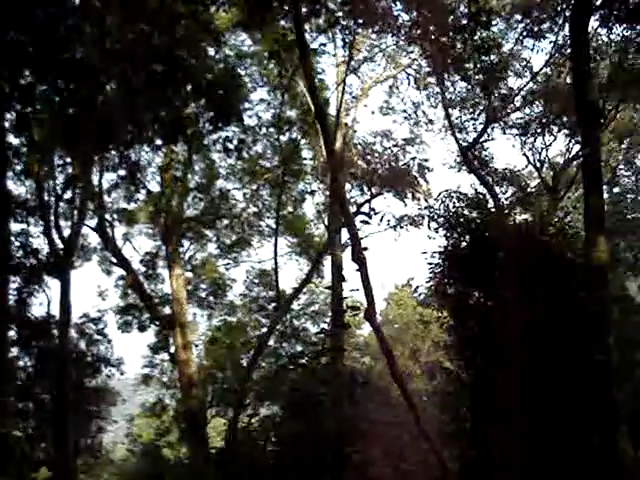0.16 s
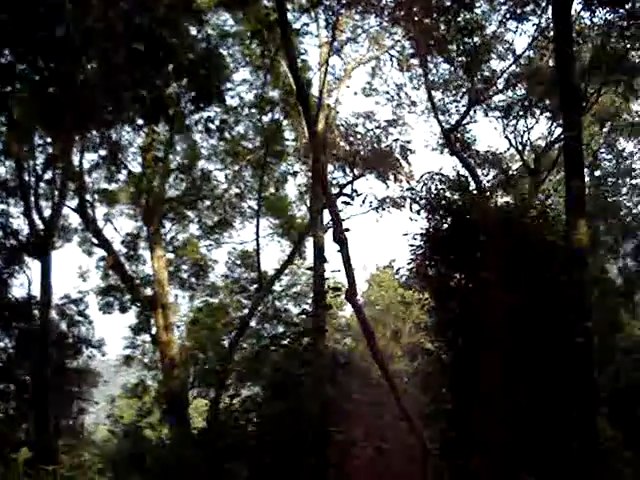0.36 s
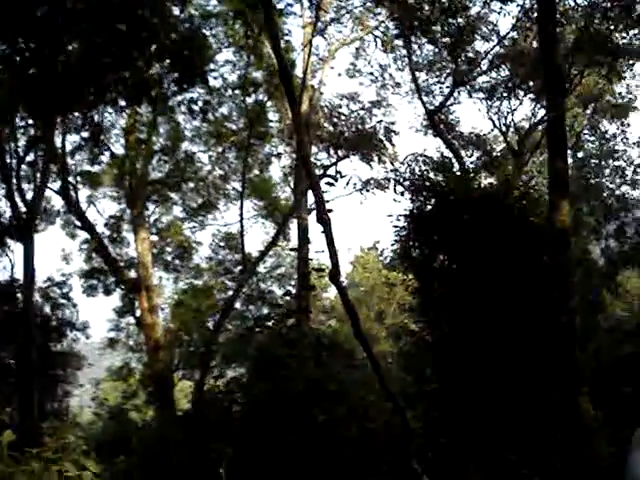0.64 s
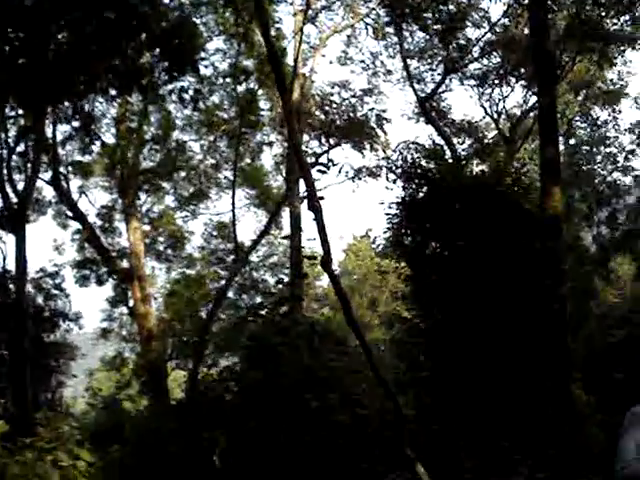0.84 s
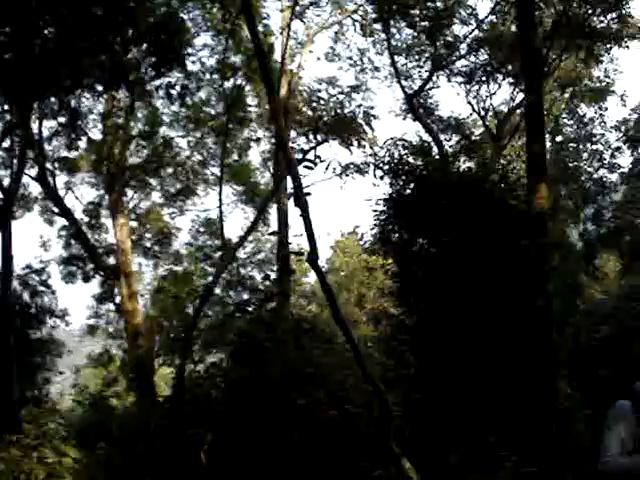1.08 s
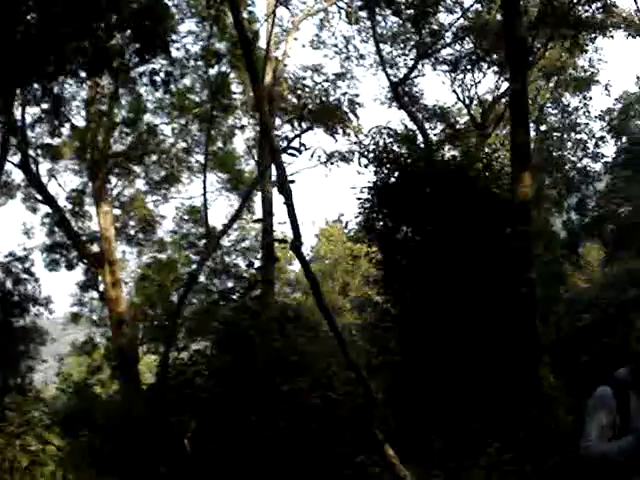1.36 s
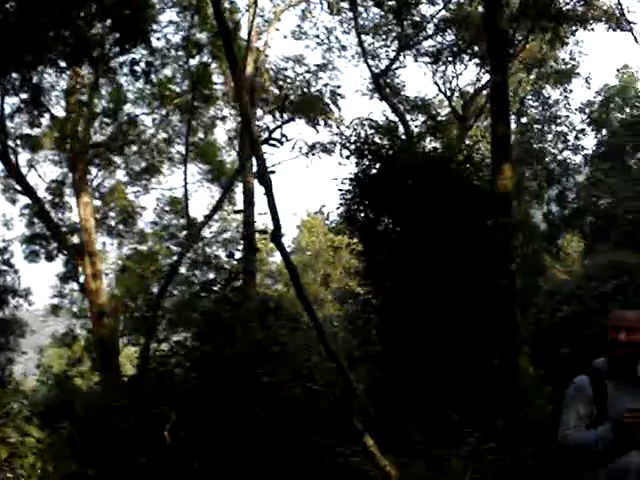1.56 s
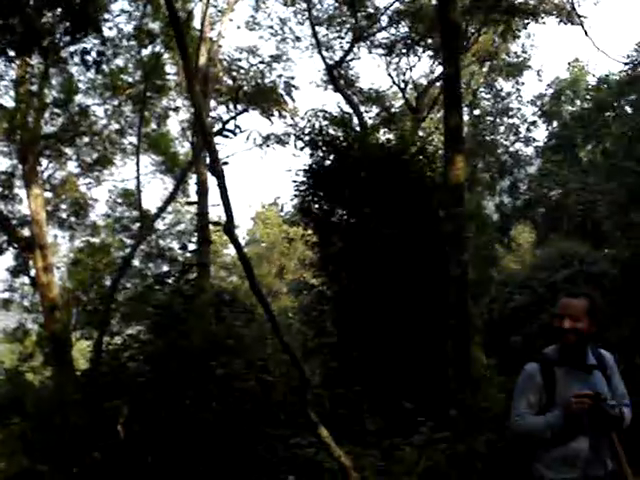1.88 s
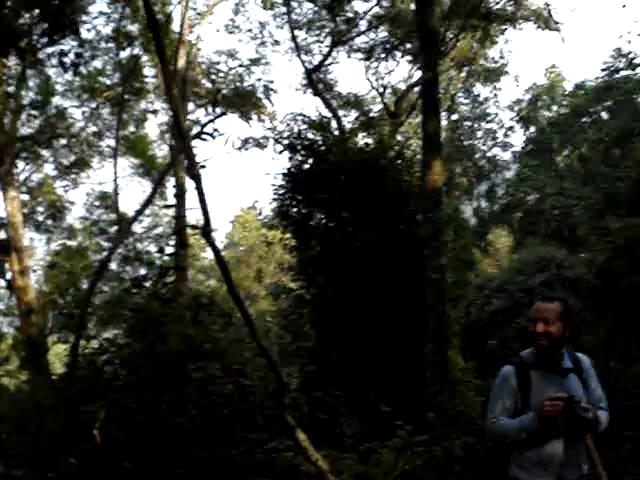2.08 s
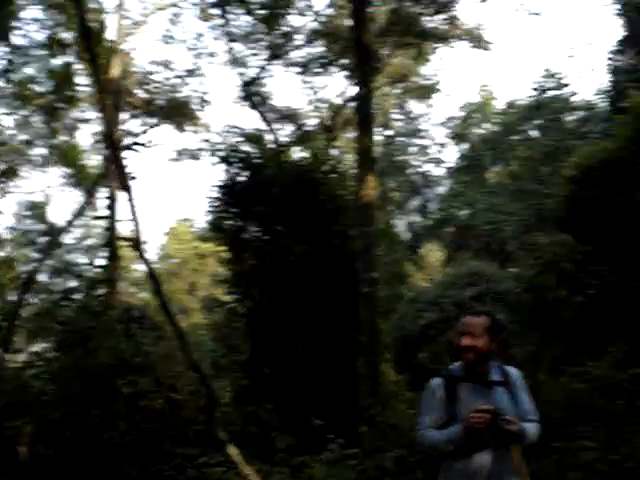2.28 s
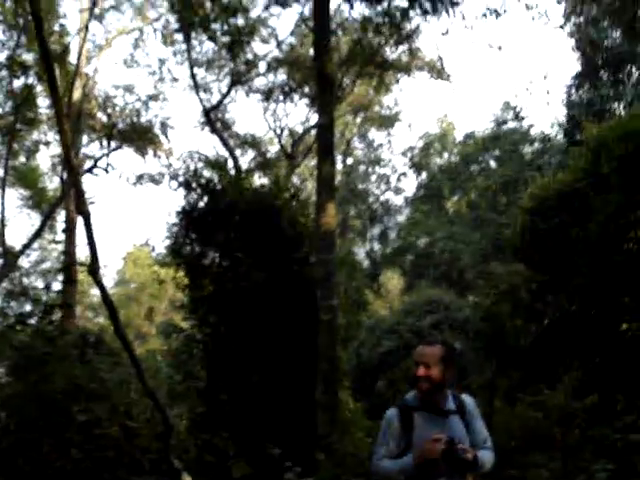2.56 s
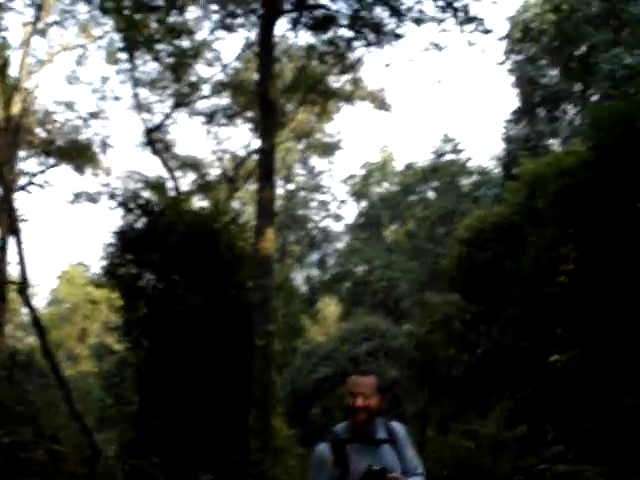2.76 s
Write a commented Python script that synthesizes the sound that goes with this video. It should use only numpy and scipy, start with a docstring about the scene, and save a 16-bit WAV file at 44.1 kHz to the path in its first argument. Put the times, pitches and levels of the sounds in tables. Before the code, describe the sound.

Apes calling far away in a forest, rough breathy screams swooping up and down almost without pause, thin squeals beneath, long diffuse echoes, faint cricket chirr, leaf and microphone hiss, and one close quick double snap of plastic.

```python
"""A forest with distant apes: one gives four hoarse arching screams from unsteady vocal folds and gated breath,
another two thin clear squeals of three harmonics. Noise tails smear both as echoes among the trunks, over the
dying echo of an earlier scream. Crickets chirr in pulsed narrow bands over the shaped noise of leaves and
microphone; at the microphone the camera body clicks twice (noise and ringing tones) and near it a leaf
rustles in grains."""
import sys
import numpy as np
from scipy import signal
from scipy.fft import rfft, irfft, next_fast_len
from scipy.io import wavfile
from scipy.ndimage import map_coordinates

SR = 44100
rng = np.random.default_rng(int(sys.argv[2]) if len(sys.argv) > 2 else 0)


def volts_from_db(level):
    """Convert decibel levels to linear amplitude ratios."""
    exponent = np.asarray(level, float) / 20
    return 10 ** exponent


def wav_out(sig):
    """Save sig, one row per channel (or a flat mono array), as 16-bit PCM at SR to the path in sys.argv[1]."""
    wavfile.write(sys.argv[1], SR, np.round(np.clip(np.atleast_2d(sig).T, -1, 1) * 32767).astype(np.int16))


N = 129213


def unit(x):
    """Scaled to rms 1."""
    return x / np.sqrt(np.mean(x ** 2) + 1e-20)


def along(points, hz):
    """Reads (f/Hz, value) points on a log frequency axis."""
    f, v = np.transpose(points)
    return np.interp(np.log(hz + 1), np.log(f + 1), v)


def curves(rows):
    """One value per sample for each column after the time."""
    s, *cols = np.transpose(rows)
    return [np.interp(np.arange(N) / SR, s, c) for c in cols]


def wobble(rate_hz):
    """A smooth random curve through rate_hz knots a second."""
    return map_coordinates(rng.standard_normal(N // 8), [np.arange(N) * rate_hz / SR])


def filtered(x, response):
    """x times a response of frequency, padded so that the end does not wrap round."""
    m = next_fast_len(N + SR // 2)
    return irfft(rfft(x, m) * response(np.fft.rfftfreq(m, 1 / SR)), m)[:N]


def hiss():
    """Steady leaves and microphone noise: many tiny random sounds add up to shaped noise."""
    # spectrum of the hiss, relative: f/Hz, level/dB
    hiss_shape = [(20, -16.5), (60, -9), (150, -1.5), (400, -1.5), (700, -2.5), (1500, 1.5), (3000, -6.5),
                  (5000, -13), (7000, -15.5), (10000, -23)]
    level_db = -50
    noise = filtered(rng.standard_normal(N), lambda hz: volts_from_db(along(hiss_shape, hz)))
    return volts_from_db(level_db) * unit(noise)


def crickets():
    """Narrow wing tones pulsed fast and grouped into chirps."""
    # one row a voice: f/Hz, width/Hz, pulse rate/Hz, chirp rate/Hz, level before the swell/dB
    voices = [(6286, 66, 58, 18, -59.5), (7330, 110, 83, 6.2, -68)]
    # swell of the whole chirr: t/s, gain/dB
    swell = [(0, -9), (.6, -6.5), (1.2, -6), (2, -4.5), (2.4, -5.5), (2.93, -21)]
    t, out = np.arange(N) / SR, np.zeros(N)
    for wing_hz, width_hz, pulse_hz, chirp_hz, db in voices:
        wing = filtered(rng.standard_normal(N), lambda hz: np.exp(-((hz - wing_hz) / width_hz) ** 2))
        pulses = 1 + 0.49 * np.cos(2 * np.pi * pulse_hz * t + wobble(1.7))
        chirps = 1 + 0.2 * np.cos(2 * np.pi * chirp_hz * t + wobble(1.7))
        out += volts_from_db(db) * unit(wing * pulses * chirps)
    swell_db, = curves(swell)
    return volts_from_db(swell_db) * out


def earlier_echo():
    """The echo of a scream that has just ended: noise in its bands, dying exponentially."""
    # spectrum left among the trunks, relative: f/Hz, level/dB
    echo_shape = [(800, -32), (1000, -13), (1200, 4), (1450, -15.5), (1650, -24), (1850, -2.5), (2400, 2),
                  (2700, -28)]
    start_db, t60_s = -50, 0.99
    echo = unit(filtered(rng.standard_normal(N), lambda hz: volts_from_db(along(echo_shape, hz))))
    return volts_from_db(start_db - 60 * np.arange(N) / SR / t60_s) * echo


def rustle():
    """One faint brush of a near leaf: sparse grains, as noise to the fifth power has rare tall peaks."""
    start_s, length_s = 2.062, 0.055
    gain_db, low_hz, high_hz = -50, 4330, 9000
    progress = np.clip((np.arange(N) / SR - start_s) / length_s, 0, 1)
    grains = unit(rng.standard_normal(N) ** 5 * volts_from_db(5 * wobble(150)))
    brush = grains * np.sin(np.pi * progress)
    return volts_from_db(gain_db) * filtered(brush, lambda hz: (hz > low_hz) & (hz < high_hz))


def clicks():
    """A plastic part of the camera body snaps twice: a dense crack and a short ring."""
    # ringing modes: f/Hz, level/dB, t60 before the stop/s
    modes = [(2512, 5, 0.015), (3150, 6.5, 0.0061)]
    # response over crack and ring: f/Hz, gain/dB
    crack_shape = [(1000, -52), (1500, -14), (2200, -1), (3300, 3), (4500, -3), (6300, -2.5), (7500, -17.5),
                   (10000, -12)]
    # the first snap is softer, rings less and rises more slowly
    start_s, gain_db = [0.5495, 0.5557], [-27, -21]
    ring_gain_db, rise_s = [-13, -1.5], [0.0006, 0.00018]
    stop_s = 0.0085
    out, t = np.zeros(N + SR), np.arange(SR // 20) / SR
    for s, db, ring_db, rise in zip(start_s, gain_db, ring_gain_db, rise_s):
        ring = sum(volts_from_db(ring_db + g - 60 * t / t60) * np.sin(2 * np.pi * hz * t) for hz, g, t60 in modes)
        crack = 2 * volts_from_db(-60 * t / 0.04) * rng.standard_normal(len(t))
        envelope = (1 - np.exp(-t / rise)) * np.exp(-(t / stop_s) ** 4)
        out[round(s * SR):][:len(t)] += volts_from_db(db) * (ring + crack) * envelope
    return filtered(out[:N], lambda hz: volts_from_db(along(crack_shape, hz)))


def forest(x):
    """A dense echo, each frequency dying at its own speed; fresh overlapping tails avoid steady lines."""
    # decay among the trunks: f/Hz, t60/s
    decay = [(800, 0.89), (1500, 0.94), (3000, 0.77), (8000, 0.19)]
    echo_db, renew_s = -1.5, 0.25  # a fresh noise tail every renew_s
    out, t = np.zeros(N), np.arange(N) / SR
    for s in np.arange(0, N / SR + renew_s, renew_s):
        hz, lag, z = signal.stft(rng.standard_normal(SR), SR, nperseg=256)
        fade = volts_from_db(-60 * lag / along(decay, hz)[:, None])
        tail = signal.istft(z * fade, SR, nperseg=256)[1]
        # neighbouring pieces overlap at equal power
        piece = x * np.cos(np.pi / 2 * np.clip((t - s) / renew_s, -1, 1))
        out += signal.fftconvolve(piece, tail / np.linalg.norm(tail))[:N]
    return volts_from_db(echo_db) * out


def squealer():
    """Clear held notes: three harmonics of the vocal folds, the second mostly strongest."""
    # the two squeals: t/s, pitch f/Hz, second harmonic level/dB, third harmonic over second/dB
    squeals = [(0.41, 1165, -90, -3), (0.44, 1168, -52, 1), (0.52, 1165, -51, -6), (0.6, 1158, -45.5, -16),
               (0.65, 1162, -51, -6), (0.7, 1166, -54, -2), (0.76, 1170, -48, -7), (0.82, 1178, -53, -3),
               (0.87, 1181, -85, -6), (1.84, 1120, -85, 0), (1.862, 1120, -51, 2), (2.04, 1116, -53, 1),
               (2.12, 1112, -55, -1), (2.18, 1108, -64, 0), (2.24, 1104, -90, 0)]
    first_db, pitch_waver, level_waver_db = -12, 0.00892, 2.6  # first_db is relative to the second harmonic
    pitch_hz, level_db, third_db = curves(squeals)
    phase = 2 * np.pi * np.cumsum(pitch_hz * (1 + pitch_waver * wobble(110))) / SR
    first = volts_from_db(first_db) * np.cos(phase)
    third = volts_from_db(third_db) * np.cos(3 * phase)
    return volts_from_db(level_db + level_waver_db * wobble(45.06)) * (first + np.cos(2 * phase) + third)


def screamer():
    """Unsteady vocal folds: harmonics, lines halfway between them and breath gated once a cycle."""
    # the four screams: t/s, pitch f/Hz, effort level/dB, roughness/0-1, half-pitch lines/dB,
    # breath level/dB, gain of the third harmonic and up/dB
    screams = [(0.02, 960, -61, 0.3, -13, -18, 2), (0.055, 1080, -45.5, 0.39, -30, -14.5, 13),
               (0.105, 1260, -39.5, 0.25, -18, -5.5, 6), (0.22, 1290, -34.5, .25, -6.5, -5, 1),
               (0.38, 1215, -31.5, .28, -16.5, -8, -2.5), (0.455, 1011, -41.5, 0.34, -30.5, -4, 7.5),
               (0.56, 951, -74, 0.41, 14, -13, 1), (0.69, 980.2, -65, 0.22, -6, -15, 13),
               (0.735, 1060, -42.5, 0.19, -27.5, -21, 4.5), (0.82, 1190, -35.5, 0.21, -34, -14.5, 7),
               (0.9, 1240, -33, 0.16, -27.5, -6, -5.5), (1.1, 1200, -35.5, 0.17, -15.5, -8, 2.5),
               (1.2, 1160, -41, 0.16, -31, -11.5, 4), (1.33, 1080, -49, 0.37, -20, -16, -0.5),
               (1.42, 900, -81, 0.13, -17, -12, 0), (1.475, 1020, -43.5, 0.19, -31, -25, 0),
               (1.55, 1150, -42, 0.28, -24, -8.5, 12), (1.66, 1250, -39, 0.19, -28, 0, -2.5),
               (1.84, 1234, -36.5, .25, -4, -8, 1), (1.96, 1009, -40, 0.4, -16, -3, -5),
               (2.06, 1100, -52, 0.36, -23, -12, 1), (2.24, 1040, -60.5, 0.34, -22, -6, 2),
               (2.295, 991, -45, 0.25, -27, -12, 10), (2.4, 1139, -37, 0.28, -24, -3, -3),
               (2.55, 1201, -34, 0.36, -15, -5.5, -8), (2.75, 1250, -34.5, 0.45, -11.5, -5.5, -15),
               (2.93, 1220, -37, 0.42, -7, -3, -3)]
    # gain of the second harmonic: t/s, gain/dB
    second = [(0, 2), (.3, -1), (.7, 1), (.85, 0.5), (1.15, 2), (1.35, -10), (1.5, 2.5), (1.7, 2),
              (1.95, 1.5), (2.1, 13.5), (2.3, 4), (2.5, 0), (2.93, -1.5)]
    # harmonics from the first up, before the gains above: level/dB
    harmonics_db = [-1, 1, -15.5, -13.5, -16.5, -32]
    # throat's response to the folds: f/Hz, gain/dB
    throat = [(600, -38), (850, 0.5), (1050, -1.5), (1600, -5), (2550, -5), (2750, -13), (3600, -8),
              (4200, -13), (6000, -14), (8500, -40.5)]
    # response to breath through the open mouth: f/Hz, gain/dB
    mouth = [(600, -29.5), (850, -6), (1050, 0.5), (1300, 12.5), (1600, 4), (2100, 8), (2550, -2.5),
             (2850, -3.5), (3500, -9), (4200, -16.5), (5500, -14), (8500, -34.5)]
    # pitch (as a fraction) and level scatter at full roughness
    jitter, jitter_hz, shimmer_db, shimmer_hz = 0.2, 199.8, 7.5, 151.7
    # hiss that comes with the upper harmonics
    rasp_db, rasp_hz, rasp_width_hz = -38, 5200, 1300

    pitch_hz, level_db, rough, half_db, breath_db, upper_db = curves(screams)
    second_db, = curves(second)
    phase = 2 * np.pi * np.cumsum(pitch_hz * (1 + jitter * rough * wobble(jitter_hz))) / SR
    folds = np.zeros(N)
    for k, db in enumerate(harmonics_db, 1):
        gain_db = db + upper_db * (k > 2) + second_db * (k == 2)
        folds += volts_from_db(gain_db) * np.cos(k * phase)
    # every second cycle differs, which puts lines half a pitch either side of each harmonic
    folds = folds * (1 + 2 * volts_from_db(half_db) * np.cos(phase / 2))
    breath = unit(rng.standard_normal(N) * (1 + np.cos(phase))) * 2
    effort = volts_from_db(level_db + shimmer_db * rough * wobble(shimmer_hz))

    voice = filtered(effort * folds, lambda hz: volts_from_db(along(throat, hz)))
    air = filtered(effort * volts_from_db(breath_db) * breath, lambda hz: volts_from_db(along(mouth, hz)))
    rasp = filtered(effort * volts_from_db(rasp_db + upper_db) * breath,
                    lambda hz: np.exp(-((hz - rasp_hz) / rasp_width_hz) ** 2))
    return voice + air + rasp


def scene():
    """Background, near sounds, then both apes direct and echoed, on one channel."""
    background = hiss() + crickets() + earlier_echo()
    near = rustle() + clicks()
    clear, hoarse = squealer(), screamer()
    direct = volts_from_db(-2) * clear + volts_from_db(-1) * hoarse
    return (background + near + forest(hoarse + clear) + direct)[None]


def band_limit(x):
    """A steep low-pass at the top of the band."""
    return signal.sosfilt(signal.butter(12, 10730, fs=SR, output="sos"), x)


def record(dry):
    """The camera's band limit: a straight slope 250 Hz wide, down to nothing at top_hz."""
    top_hz = 10180
    mix = filtered(dry[0], lambda hz: np.clip((top_hz - hz) / 250, 0, 1))[None]
    return band_limit(mix)


dry = scene()
out = record(dry)
wav_out(out)
```